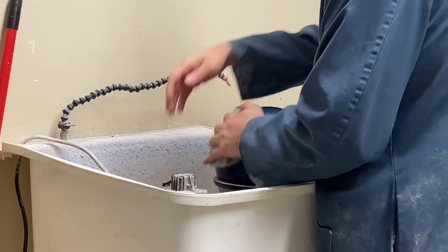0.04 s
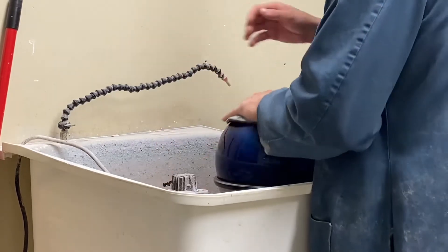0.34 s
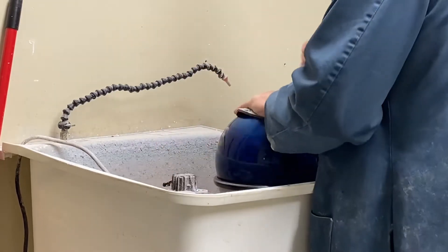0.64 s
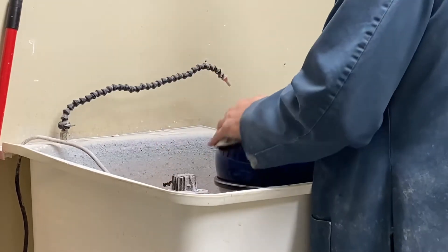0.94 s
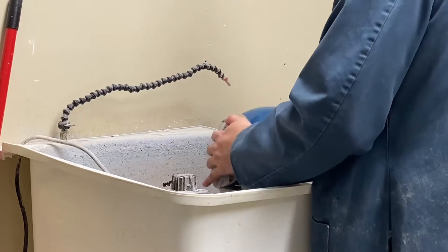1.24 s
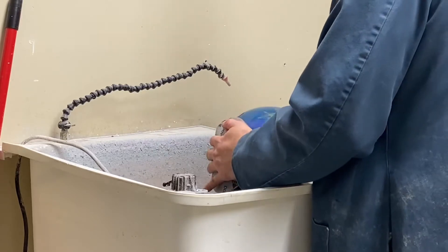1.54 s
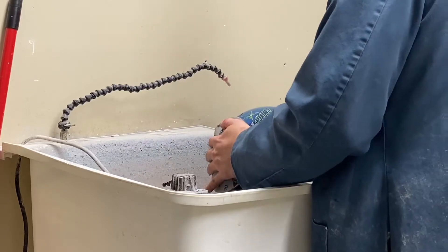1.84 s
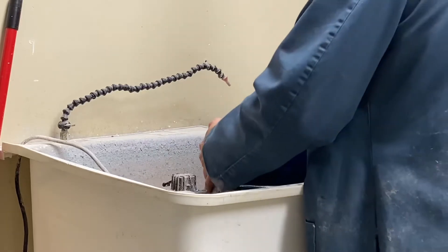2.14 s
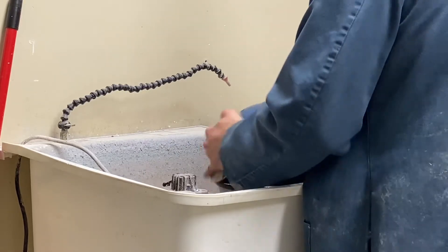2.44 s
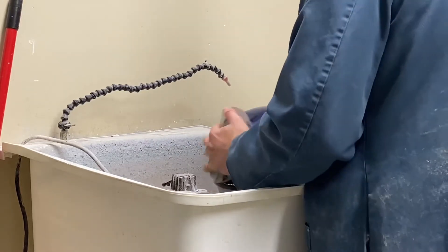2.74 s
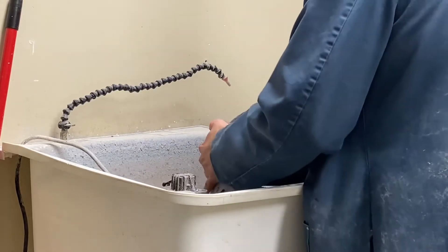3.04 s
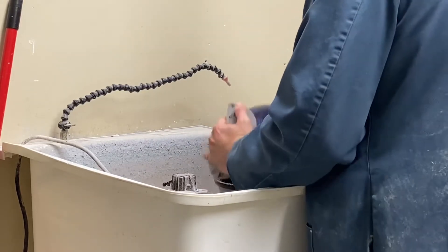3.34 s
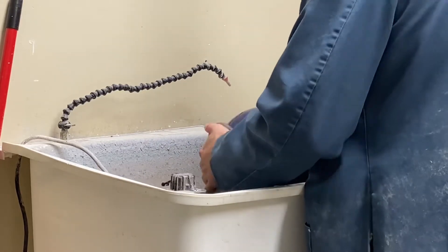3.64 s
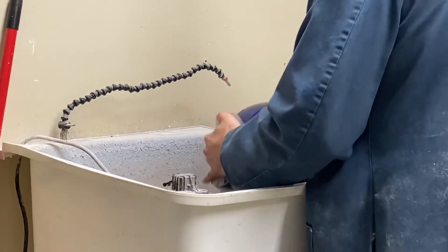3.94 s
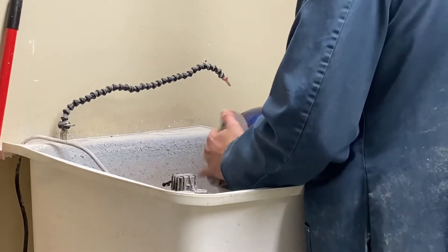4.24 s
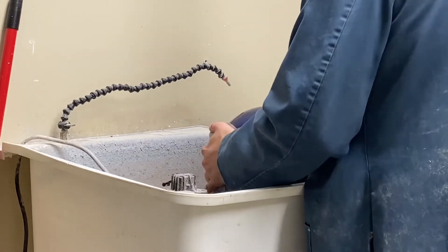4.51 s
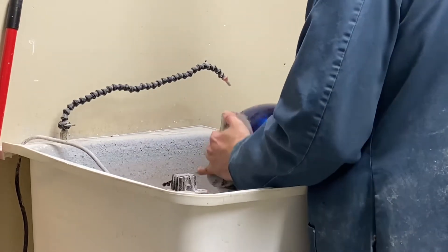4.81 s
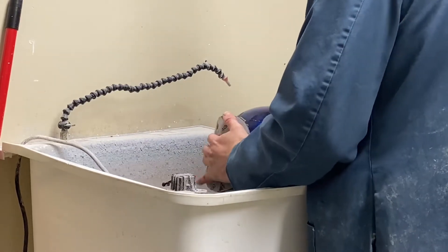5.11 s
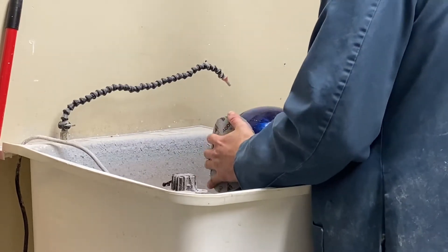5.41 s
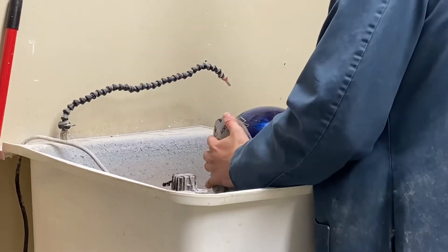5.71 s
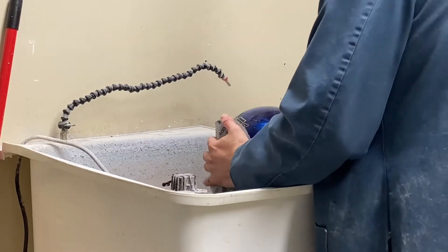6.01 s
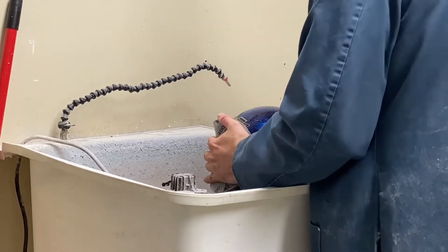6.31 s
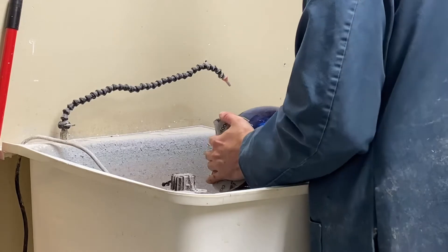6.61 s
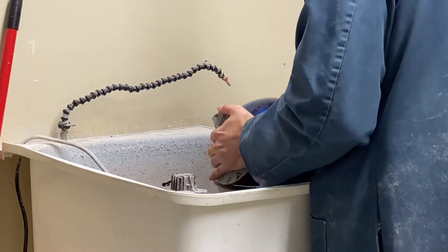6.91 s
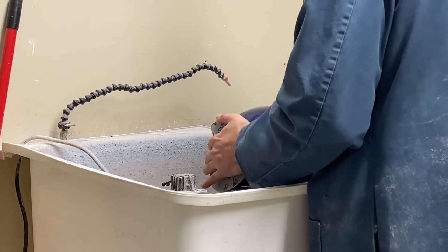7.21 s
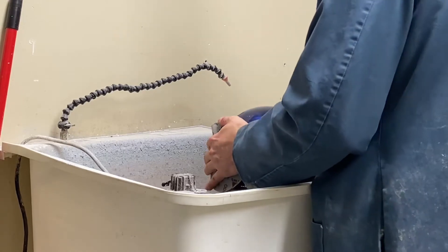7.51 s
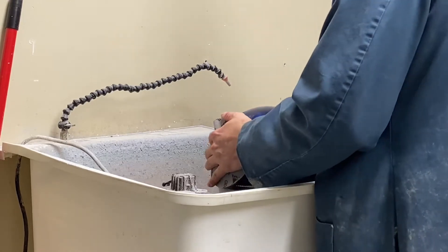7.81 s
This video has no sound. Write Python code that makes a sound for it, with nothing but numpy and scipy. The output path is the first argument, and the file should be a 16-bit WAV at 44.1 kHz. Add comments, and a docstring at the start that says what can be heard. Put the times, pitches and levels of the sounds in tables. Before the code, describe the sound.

A spinning bowling ball coasts to rest under a wet sanding pad, then is turned by hand, knocking heavily in a plastic sink.

```python
"""A low rumble and a wet hiss, close by: a bowling ball on a motor spinner in a plastic workshop sink
coasts to rest under a sanding pad. Turned by hand, stroke by stroke, it drops back into its cup five
times: the tub booms and the spinner rattles. Between the knocks the ball grumbles in the cup while pad
and sleeve rub and tick. A stereo microphone pair also picks up one clack from further off, early on,
and a low motor hum underneath."""
import sys
import numpy as np
from scipy import signal
from scipy.fft import rfft, irfft, next_fast_len
from scipy.io import wavfile
from scipy.ndimage import uniform_filter1d

SR = 44100
rng = np.random.default_rng(int(sys.argv[2]) if len(sys.argv) > 2 else 0)


def generate_wav(signal):
    """Clip the signal to [-1, 1] and save it as 16-bit WAV at the path in sys.argv[1]."""
    frames = np.transpose(np.atleast_2d(signal))
    scaled = np.clip(frames, -1, 1) * 32767
    pcm = np.round(scaled).astype(np.int16)
    wavfile.write(sys.argv[1], SR, pcm)


N = 346626
RING_SAMPLES = SR
TURNS_PER_S, COAST_START_S, COAST_S = 5.63, 0.87, 1.01


def ball_speed():
    """Share of full speed: steady, then friction slows the ball evenly to a near standstill."""
    return np.clip(1 - (np.arange(N) / SR - COAST_START_S) / COAST_S, 1e-3, 1)


def spinning_ball():
    """The cup rumbles and the wet pad hisses, fading with the ball's speed; the hiss ends as the pad lifts."""
    # spectra of the cup and of the wet pad: frequency_hz, level_db
    cup_spectrum = [(15, -42), (25, -23), (65, 2), (92, -3), (189, -2.5), (243, -14), (306, -10.5),
                    (438, -4.5), (514, -13), (697, -23), (790, -16), (896, -15), (997, -33), (1190, -20),
                    (1800, -35), (2340, -56), (3960, -120)]
    pad_spectrum = [(400, -17), (1000, -15), (2000, 0.5), (3500, 2), (7000, 1), (8500, -2.5), (11000, -5.5),
                    (16000, -5.5)]
    rumble_db, rumble_db_per_decade = -48, 42  # at full speed, and the fall per tenfold slowing
    hiss_db, hiss_db_per_decade = -55.5, 9
    lift_s, lift_db_per_s = 1.58, 97
    decades = np.log10(ball_speed())
    rumble = friction(cup_spectrum, grain_db=0.5, slip_db=3.5, slip_hz=15)
    rumble *= amp(rumble_db + rumble_db_per_decade * decades)
    hiss = friction(pad_spectrum, grain_db=0, slip_db=2.35, slip_hz=40)
    hiss *= amp(hiss_db + hiss_db_per_decade * decades)
    pad_contact = amp(-lift_db_per_s * np.maximum(np.arange(N) / SR - lift_s, 0))
    return rumble + pad_contact * hiss


def pad_swishes():
    """The ball drags on the pad and stirs its resonances once a turn, swelling where the pad catches."""
    # resonances of the pad: centre_hz, width_hz, level_db
    resonances = [(867, 170, 4), (1476, 74, 5), (1890, 230, -2), (2980, 600, -5), (5710, 740, -6.5)]
    # the pad catches on the slowing ball: start_s, level_db
    catches = [(1.105, -69), (1.265, -61.5), (1.515, -61)]
    drag_db, swing_db, swell_s = -62, 3, 0.03
    t, hz = np.arange(N) / SR, np.fft.rfftfreq(N, 1 / SR)
    response = sum(amp(db) / (1 + (2 * (hz - centre) / width) ** 2) for centre, width, db in resonances)
    speed = ball_speed()
    angle = 2 * np.pi * TURNS_PER_S * np.cumsum(speed) / SR
    drag = speed * amp(drag_db + swing_db * np.sin(angle))
    for start_s, level_db in catches:
        age = np.maximum(t - start_s, 0) / swell_s
        drag += amp(level_db) * (age * np.exp(1 - age)) ** 2
    return drag * unit(irfft(rfft(rng.standard_normal((2, N))) * response, N))


def ball_drops(contacts=3):
    """The ball lands in its cup and rebounds, each time sooner and weaker; rebounds barely move the tub."""
    # drops: start_s, boom_db, ring_db, slap_db, rattle_db, crack_db, first_rebound_s, rebound_step_db
    drops = [(2.4727, -5, -18, -13.5, -18.5, -30.5, 0.054, -10),
             (3.254, -4, -18, -9, -15.5, -26, 0.061, -9),
             (3.9926, -8.5, -27.5, -16.5, -21.5, -38.5, 0.05, -11.5),
             (4.733, -10.5, -20, -15.5, -19, -33.5, .048, -13.5),
             (6.938, -14.5, -33, -31.5, -30.5, -47.5, 0.058, -8.5)]
    gap_shrink, extra_boom_step_db = 0.71, -3
    out = np.zeros((2, N))
    for start_s, boom_db, *contact_db, rebound_s, step_db in drops:
        for k in range(contacts):
            add(out, start_s, amp(k * step_db) * knock(boom_db + k * extra_boom_step_db, *contact_db))
            start_s += rebound_s * gap_shrink ** k
    return out


def knock(boom_db, ring_db, slap_db, rattle_db, crack_db):
    """Ball cracks and slaps on cup, the spinner rings and rattles, the tub booms, deep modes swell last."""
    # spectra of the bright crack, the hard slap and the spinner's rattle: frequency_hz, level_db
    crack = [(600, -20), (1500, -5), (2400, 14), (4000, 1), (6000, -2), (8500, -13.5), (11000, -33),
             (16000, -19)]
    slap = [(300, -19), (600, -2), (850, 7.5), (1150, 1.5), (1550, -1.5), (2000, -15.5), (3000, -18),
            (6000, -56.5)]
    rattle = [(25, -13.5), (60, -11.5), (95, -6.5), (165, -4.5), (260, 2.5), (420, 3.5), (600, -4),
              (850, -8), (1300, -15), (2000, -17.5), (2800, -30.5), (3600, -30), (8000, -41.5)]
    # modes of cup and housing, of the plastic tub, and of stand and room: pitch_hz, level_db, t60_s
    cup_modes = [(340.5, 0.5, 0.36), (440.3, -0.5, 0.34), (584, -19.5, 0.44), (646, -7, 0.36),
                 (821, -10, 0.36), (908, -8, 0.2), (1117, -3.5, 0.26), (1257, -8.5, 0.12),
                 (1303, -12.5, 0.27), (1365, -12.5, 0.212), (1585, -20, 0.2), (1690, -26.5, 0.22),
                 (1806, -13.5, 0.2), (2230, -33, 0.12), (2335, -18, 0.26), (2220, -29, 0.11),
                 (2335, -23, 0.12), (2640, -26, 0.369), (2800, -25, 0.41), (2975, -37.5, 0.46),
                 (3026, -36, 0.3)]
    tub_modes = [(139.2, -11.5, 0.59), (157, -2, 0.34), (179.4, 1, 0.27), (214.2, -11.5, 0.28)]
    deep_modes = [(60, -7.5, 0.56), (83, -28.5, 0.35), (108.5, -7.5, 0.45)]
    boom_lag_s = 0.005
    out = amp(crack_db) * burst(crack, rise_s=0.00199, decay=0.71, direct=0.12, direct_s=0.014, peaky_db=4)
    out += amp(slap_db) * burst(slap, rise_s=0.0035, decay=0.34, peaky_db=4.5)
    out += amp(rattle_db) * burst(rattle, rise_s=0.0074, direct=0.92, direct_s=0.093, peaky_db=2.5)
    out += amp(ring_db) * ring(cup_modes, rise_s=0.005, scatter=0.0027)
    boom = ring(tub_modes, rise_s=0.0023, scatter=0.015) + ring(deep_modes, rise_s=0.059, scatter=0.0069)
    add(out, boom_lag_s, amp(boom_db) * boom)
    return out


def hand_strokes():
    """With each stroke the ball judders round in its cup while pad and sleeve slide over it."""
    # the hand turns the ball: start_s, length_s, grumble_db, scrape_db, rustle_db
    strokes = [(1.786, 0.25, -77, -80, -61), (2.174, 0.064, -53, -56.5, -61.5),
               (2.328, 0.37, -50.5, -65, -60.5), (2.662, 0.19, -40.5, -60.5, -64),
               (2.933, .11, -41.5, -59.5, -64.5), (3.066, 0.24, -54, -66, -63.5),
               (3.501, 0.32, -41, -59.5, -61.5), (3.897, 0.14, -42.5, -55.5, -72),
               (4.198, 0.2, -46.5, -60.5, -65.5), (4.442, 0.063, -43.5, -57.5, -58),
               (4.681, 0.054, -62, -52, -63.5), (4.942, 0.41, -45.5, -64.5, -66.5),
               (5.357, 0.22, -43.5, -58.5, -69.5), (5.645, 0.023, -51.5, -52.5, -57),
               (5.916, 0.26, -54.5, -56, -63.5), (6.233, 0.3, -53, -56, -57.5),
               (6.496, 0.048, -45.5, -52.5, -58), (6.825, 0.1, -52.5, -56.5, -62),
               (7.113, 0.15, -53.5, -64, -70.5), (7.274, 0.09, -47, -67, -91),
               (7.492, 0.076, -42, -60.5, -61.5), (7.589, 0.17, -46, -60.5, -63)]
    # spectra of juddering ball, scraping pad and rustling sleeve: frequency_hz, level_db
    ball = [(25, -18.5), (55, 4.5), (90, 4.5), (130, 5.5), (175, 2.5), (240, -9.5), (400, -10.5),
            (650, -18.5), (1500, -49)]
    pad = [(200, 13), (500, 0.5), (900, 7), (1300, 1), (2000, -2.5), (3200, -7), (6000, -41.5)]
    sleeve = [(800, -19.5), (2200, 2), (4500, -2.5), (6500, -5.5), (8500, -11.5), (11000, -18),
              (16000, -17)]
    starts_s, lengths_s, grumble_db, scrape_db, rustle_db = np.transpose(strokes)
    grumble = friction(ball, grain_db=-1.5, slip_db=3.5, slip_hz=39)
    grumble *= stroke_gain(starts_s, lengths_s, grumble_db, release_db_per_s=68)  # lingers in the tub
    scrape = friction(pad, grain_db=3.5, slip_db=1.6, slip_hz=35)
    scrape *= stroke_gain(starts_s, lengths_s, scrape_db)
    rustle = friction(sleeve, grain_db=1, slip_db=1.3, slip_hz=40)
    rustle *= stroke_gain(starts_s, lengths_s, rustle_db)
    return grumble + scrape + rustle


def stroke_gain(starts_s, lengths_s, levels_db, attack_s=0.02, sag_db_per_s=7, release_db_per_s=108):
    """Each stroke grips quickly, eases while it lasts and dies away in the sink; overlaps add in power."""
    power = np.zeros(N)
    for start_s, length_s, level_db in zip(starts_s, lengths_s, levels_db):
        age_s = np.maximum(np.arange(N) / SR - start_s, 0)
        fall_db = sag_db_per_s * age_s + release_db_per_s * np.maximum(age_s - length_s, 0)
        power += (np.minimum(age_s / attack_s, 1) * amp(level_db - fall_db)) ** 2
    return np.sqrt(power)


def ball_bumps():
    """The ball rocks softly against the cup; each push swells slowly, mostly in the tub's low modes."""
    # soft pushes: start_s, level_db
    pushes = [(.73, -32), (1.12, -42.5), (2.204, -40), (2.358, -39), (3.655, -24.5), (3.706, -26.5),
              (3.771, -26), (3.82, -30), (4.416, -30), (6.343, -32.5), (6.87, -17), (7.59, -32)]
    # modes that a push sways: pitch_hz, level_db, t60_s
    sway_modes = [(174.5, 2, 0.14), (193, 0.5, 0.078), (336.6, -25, 0.23), (481, -22, 0.16)]
    out = np.zeros((2, N))
    for start_s, level_db in pushes:
        add(out, start_s, amp(level_db) * ring(sway_modes, rise_s=0.012, scatter=0.014))
    return out


def finger_taps():
    """Pad and fingers tap the ball: a dull body, a gritty edge and a short ring, echoed by the sink."""
    # light contacts: start_s, body_db, edge_db, ring_db
    taps = [(2.359, -77, -52.5, -84.5), (2.967, -62.5, -60.5, -55.5), (3.753, -51.5, -49.5, -41),
            (4.456, -54.5, -56, -53), (4.842, -47, -53, -63), (5.394, -65, -57, -65),
            (5.448, -59.5, -50, -70), (5.89, -58.5, -73, -68.5), (6.023, -43.5, -70, -63),
            (6.068, -50.5, -72, -64.5), (6.311, -48, -47, -46), (6.398, -56, -62, -60),
            (6.522, -49, -53, -57), (6.83, -66, -67, -70), (6.953, -54, -46.5, -57), (7.636, -55, -49, -65)]
    # spectra of a tap's body and edge: frequency_hz, level_db
    dull = [(100, -9), (250, -1), (800, 0), (1300, -2), (2000, -1), (3500, -7), (7000, -22), (16000, -38)]
    gritty = [(800, -19.5), (2000, 6.5), (4000, 7), (6500, 0.5), (8500, -10), (16000, -13)]
    # modes that a tap rings: pitch_hz, level_db, t60_s
    tap_modes = [(1278, -10.5, 0.19), (1480, -6, .2), (1550, -5, 0.13), (1980, -12, 0.1),
                 (2070, -20.5, 0.22), (2480, -15.5, 0.22)]
    out = np.zeros((2, N))
    for start_s, body_db, edge_db, ring_db in taps:
        body = burst(dull, rise_s=0.001, direct=0.77, direct_s=0.016, peaky_db=1.5)
        edge = burst(gritty, rise_s=0.0013, decay=0.55, direct=0.67, direct_s=0.0011, peaky_db=2)
        tone = ring(tap_modes, rise_s=0.0011, scatter=0.013)
        add(out, start_s, amp(body_db) * body + amp(edge_db) * edge + amp(ring_db) * tone)
    return out


def ting_and_squeal(cluster_size=4):
    """A short metallic ting, then a faint, thin, high squeal of rubbing that lingers."""
    # onset of the ting: start_s, level_db
    onsets = [(4.842, -68.5)]
    # short tones of the ting and two long ones of the rubbing squeal: pitch_hz, level_db, t60_s
    tones = [(1200, 12.5, 0.6), (1670, 20.5, 0.3), (2270, 13, 0.42), (2830, 5, 0.38), (4587, -6, 2.4),
             (5080, 16, 0.17), (5394, 10, 0.2), (5712, 9, 0.27), (6412, -11.5, 4)]
    out = np.zeros((2, N))
    for start_s, level_db in onsets:
        # every tone is a close cluster, so it shimmers
        shimmer = sum(ring(tones, rise_s=0.0025, scatter=0.015) for _ in range(cluster_size))
        add(out, start_s, amp(level_db) * shimmer)
    return out


def distant_clack():
    """Something light is put down further from the microphones: a bright clack, then a hollow ring."""
    # the object lands: start_s, ring_db, clack_db
    landings = [(0.731, -29, -27.5)]
    # spectrum of the contact: frequency_hz, level_db
    bright = [(100, 3), (170, 6.5), (280, -6.5), (500, 2.5), (1000, -6), (3000, -7), (4500, -4),
              (6200, 4.5), (8000, -1.5), (11000, -2.5), (16000, -9)]
    # modes of the object: pitch_hz, level_db, t60_s
    object_modes = [(473, 0, 0.41), (1505, 3.5, 0.077), (3840, -26, 0.29), (6600, -21, 0.18),
                    (6885, -15, 0.21), (8129, -39, 0.3), (9184, -15, 0.11), (11400, -24, 0.29)]
    out, ring_lag_s = np.zeros((2, N)), 0.008
    for start_s, ring_db, clack_db in landings:
        clack = burst(bright, rise_s=0.008, decay=0.87, direct=1.44, direct_s=0.02)
        add(out, start_s, amp(clack_db) * clack)
        add(out, start_s + ring_lag_s, amp(ring_db) * ring(object_modes, rise_s=0.0029))
    return out


def motor_hum(pitch_hz=75.2, waver=0.015, flutter_db=0.78):
    """A low motor hum that wavers in pitch and level."""
    # course of the hum: time_s, level_db
    course = [(0, -51.5), (1, -62), (1.7, -69), (2.1, -62), (2.8, -61.5), (5, -55.5), (5.8, -52),
              (7, -47.5), (7.86, -51.5)]
    level_db = np.interp(np.arange(N) / SR, *np.transpose(course))
    phase = 2 * np.pi * np.cumsum(pitch_hz * (1 + waver * wander(rate_hz=3.1))) / SR
    return unit(np.sin([phase, phase + np.pi / 2])) * amp(level_db + flutter_db * wander(rate_hz=25))


def room_tone(level_db=-60.5):
    """The still air of the workshop: faint, steady noise, mostly bass."""
    # spectrum of the room: frequency_hz, level_db
    air = [(25, -12.5), (50, 4), (75, -1.5), (130, -16.5), (300, -24.5), (1000, -27.5), (3000, -30.5),
           (8000, -39.5), (15000, -54.5)]
    return amp(level_db) * unit(colour(rng.standard_normal((2, N)), air))


def friction(spectrum, grain_db, slip_db, slip_hz):
    """Dense tiny slips of uneven size, bunched as the contact grips and lets go."""
    slips = rng.standard_normal((2, N)) * amp(grain_db * wander(rate_hz=1500) + slip_db * wander(slip_hz))
    return unit(colour(slips, spectrum))


def ring(modes, rise_s, scatter=0.0057):
    """Dying tones as mid and side, slightly detuned by chance; neighbours start in opposite directions."""
    t = np.arange(RING_SAMPLES) / SR
    out = np.zeros((2, RING_SAMPLES))
    for k, (pitch_hz, level_db, t60_s) in enumerate(modes):
        phase = 2 * np.pi * pitch_hz * (1 + scatter * rng.standard_normal()) * t
        side_phase = phase + rng.choice([-1, 1]) * np.pi / 2
        out += (-1) ** k * amp(level_db - 60 * t / t60_s) * np.sin([phase, side_phase])
    return out * (1 - np.exp(-t / rise_s))


def burst(spectrum, rise_s, decay=1, direct=0, direct_s=0.01, peaky_db=3):
    """Countless uneven fine modes and wall echoes build up, then each octave dies at its own rate."""
    # ring-out of sink and workshop, before scaling by decay: frequency_hz, t60_s
    ring_out = [(60, 0.99), (170, 0.56), (400, 0.4), (1000, 0.35), (2500, 0.4), (6000, 0.45), (15000, 0.19)]
    t, hz = np.arange(RING_SAMPLES) / SR, np.fft.rfftfreq(RING_SAMPLES, 1 / SR)
    uneven = unit(uniform_filter1d(rng.standard_normal(len(hz)), size=45)) * np.minimum(hz / 700, 1)
    fine_modes = irfft(rfft(rng.standard_normal((2, RING_SAMPLES))) * amp(peaky_db * uneven))
    bins = rfft(unit(colour(fine_modes, spectrum)))
    octave = np.log2(np.clip(hz, 62.5, 16000) / 62.5)
    out = 0
    for k in range(9):
        band = irfft(bins * np.maximum(1 - abs(octave - k), 0))
        t60_s = decay * at_hz(ring_out, 62.5 * 2 ** k)
        out += band * amp(-60 * t / t60_s)
    return out * (1 - np.exp(-t / rise_s)) * (1 + direct * np.exp(-t / direct_s))


def amp(db):
    """Decibels to gain."""
    return 10 ** (np.asarray(db) / 20)


def unit(x):
    """Scale to rms 1."""
    return x / np.sqrt(np.mean(x ** 2))


def at_hz(points, hz):
    """Read (frequency_hz, value) points on a log-frequency axis."""
    frequency_hz, value = np.transpose(points)
    return np.interp(np.log(np.maximum(hz, 1)), np.log(frequency_hz), value)


def colour(x, spectrum):
    """Filter by a spectrum of (frequency_hz, level_db) points."""
    size = next_fast_len(x.shape[-1])
    gain = amp(at_hz(spectrum, np.fft.rfftfreq(size, 1 / SR)))
    return irfft(rfft(x, size) * gain, size)[..., :x.shape[-1]]


def wander(rate_hz):
    """A smooth random curve of rms 1 that takes a new course rate_hz times a second."""
    hold = int(SR / rate_hz)
    steps = np.repeat(rng.standard_normal(N // hold + 1), hold)
    return unit(uniform_filter1d(steps, hold)[:N])


def add(track, start_s, sound):
    """Mix a sound in at start_s."""
    i = int(start_s * SR)
    track[:, i:i + sound.shape[1]] += sound[:, :track.shape[1] - i]


def scene():
    """All sources as mid and side, turned into left and right by the microphone pair."""
    # narrow bands where the two microphone ports cancel: centre_hz, width_hz, depth_db
    port_dips = [(9070, 540, -20.5), (13400, 480, -41.5)]
    # stereo width: frequency_hz, side_gain_db
    stereo_width = [(40, -22.5), (190, -15.5), (330, -5.5), (700, -6), (1300, -1), (2200, -15.5),
                    (6000, -68.5), (8000, 1.5), (10000, -1.5), (13400, -3.5), (15000, 0.5)]
    at_sink = spinning_ball() + pad_swishes() + hand_strokes() + ball_drops() + ball_bumps() + finger_taps()
    mid, side = at_sink + ting_and_squeal() + distant_clack() + motor_hum() + room_tone()
    hz = np.fft.rfftfreq(N, 1 / SR)
    dips_db = sum(db * np.exp(-((hz - centre) / width) ** 2) for centre, width, db in port_dips)
    mid = irfft(rfft(mid) * amp(dips_db), N)
    side = colour(side, stereo_width)
    return np.array([mid + side, mid - side])


def record(dry):
    """The recorder rounds the loudest peaks and cuts the top."""
    top_hz = 15900
    rounded = dry / (1 + dry ** 4) ** (1 / 4)
    return signal.sosfilt(signal.ellip(10, 0.2, 80, top_hz, fs=SR, output="sos"), rounded)


dry = scene()
out = record(dry)
generate_wav(out)
```